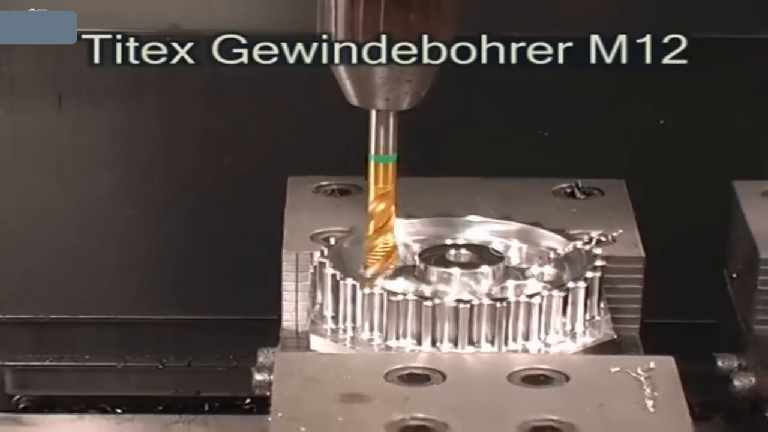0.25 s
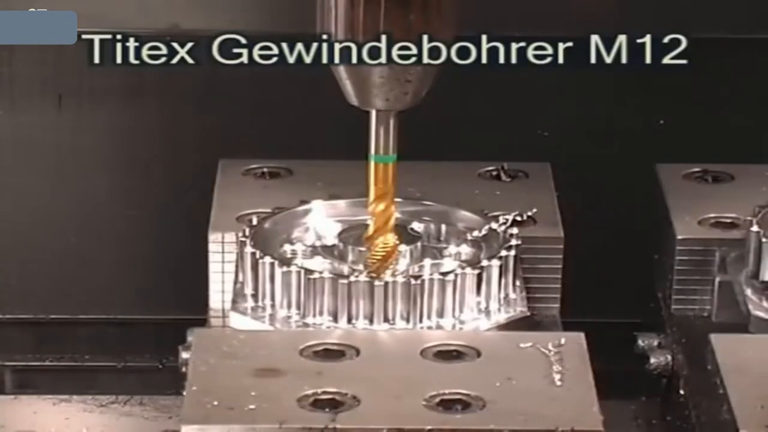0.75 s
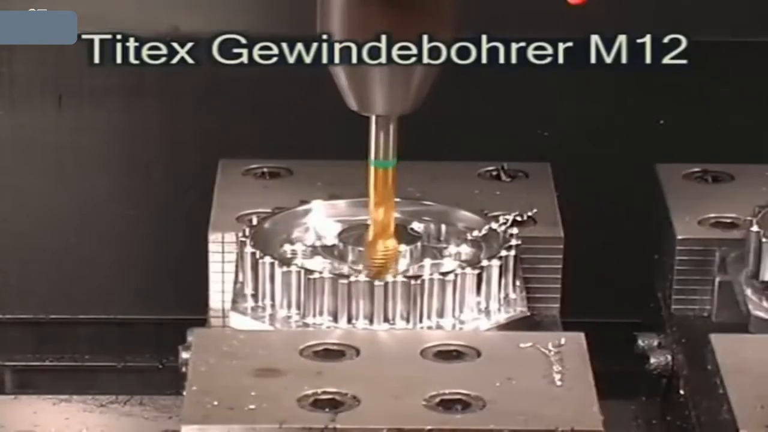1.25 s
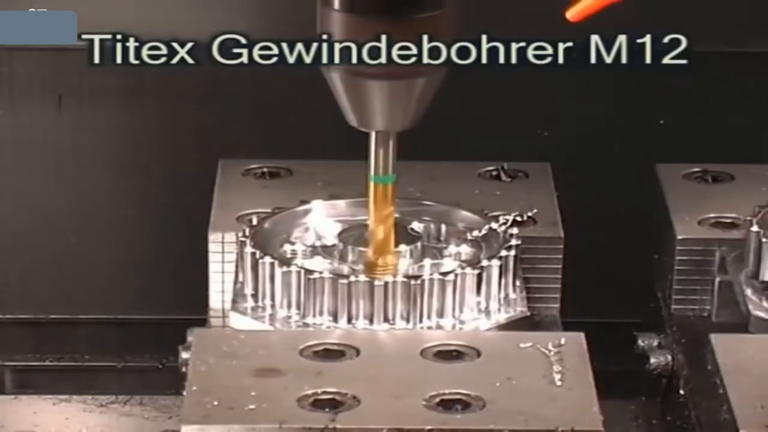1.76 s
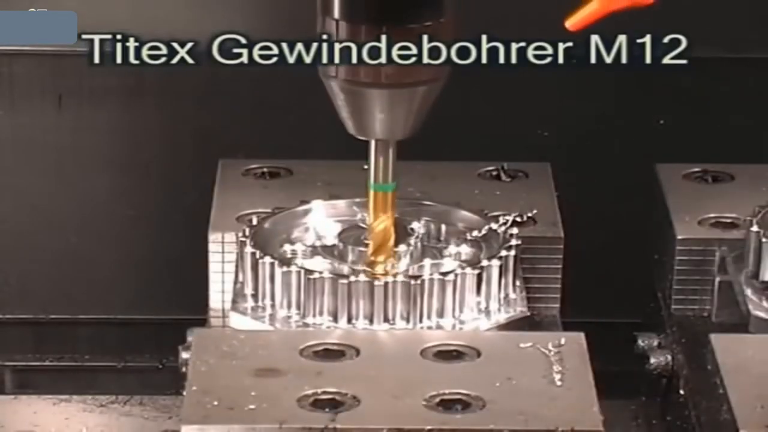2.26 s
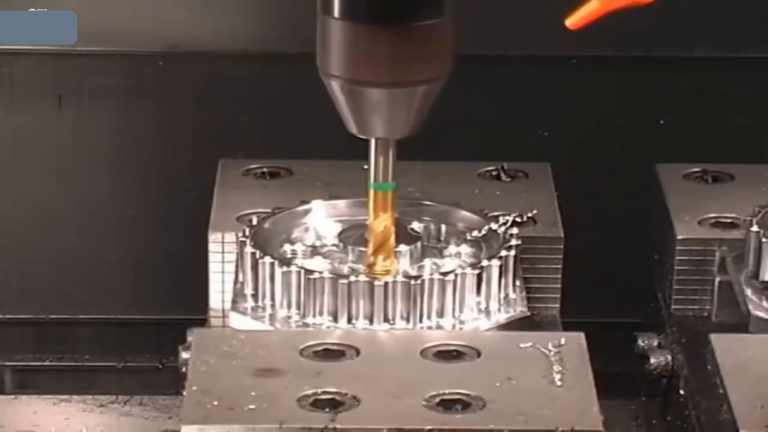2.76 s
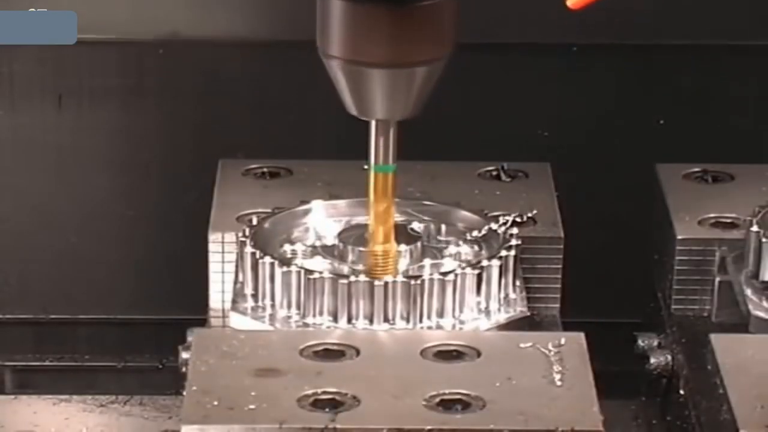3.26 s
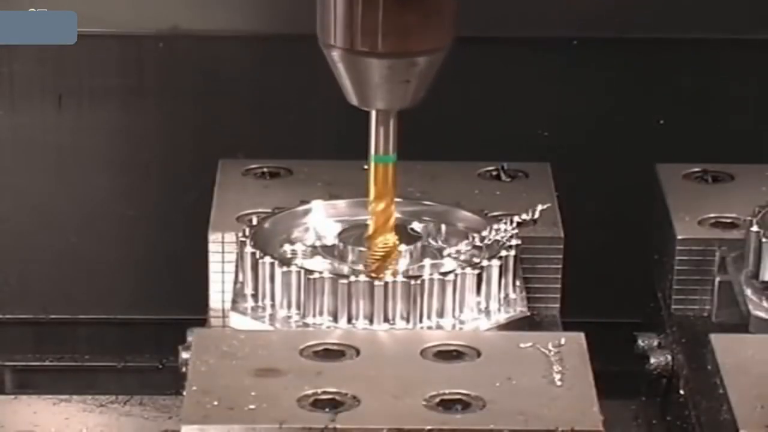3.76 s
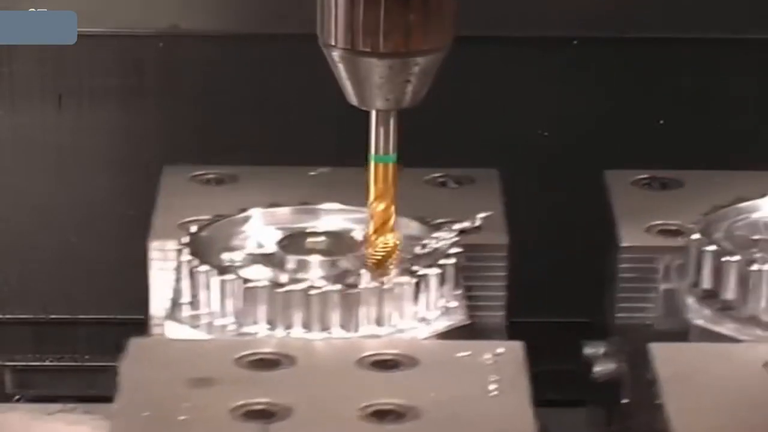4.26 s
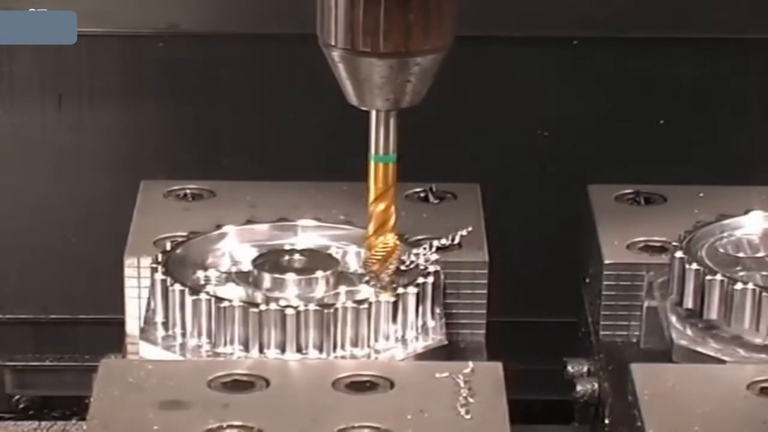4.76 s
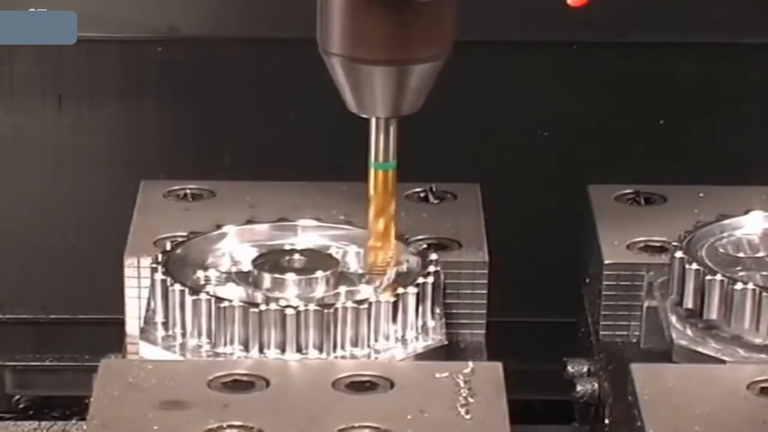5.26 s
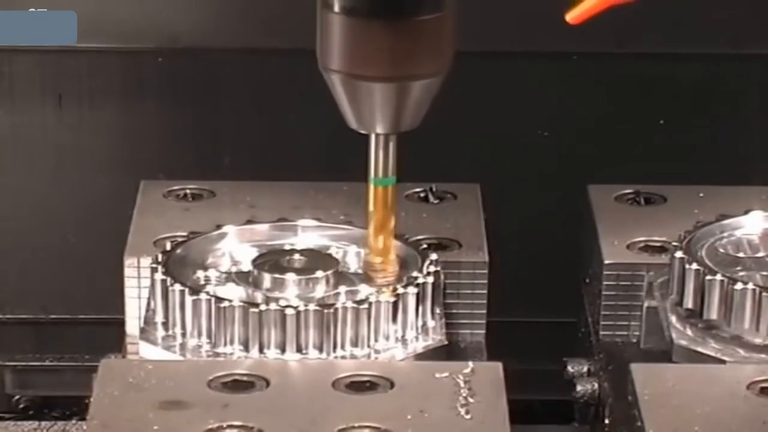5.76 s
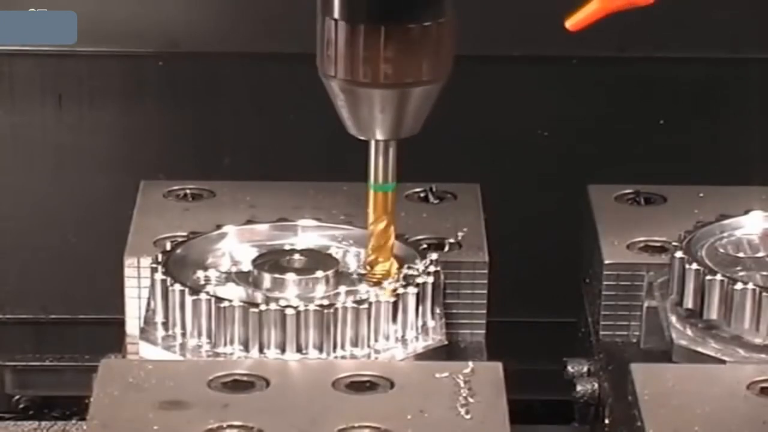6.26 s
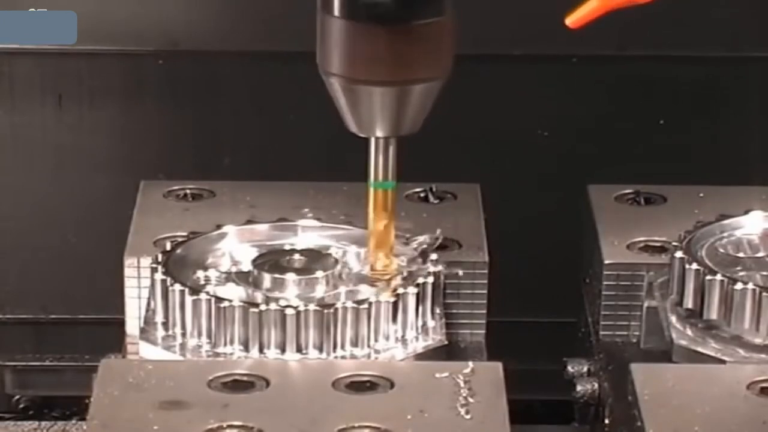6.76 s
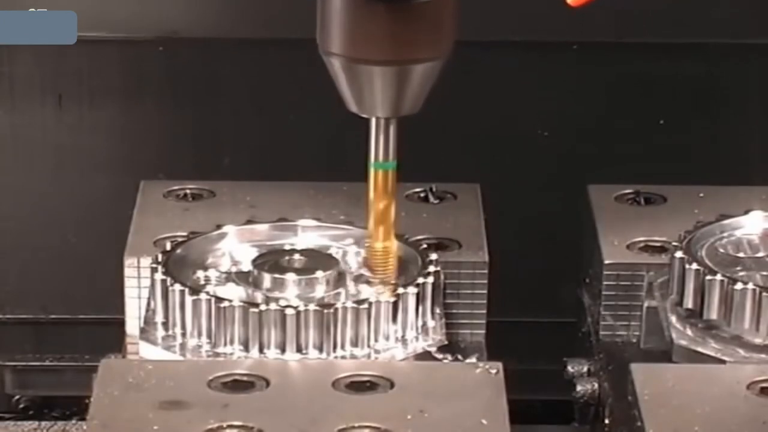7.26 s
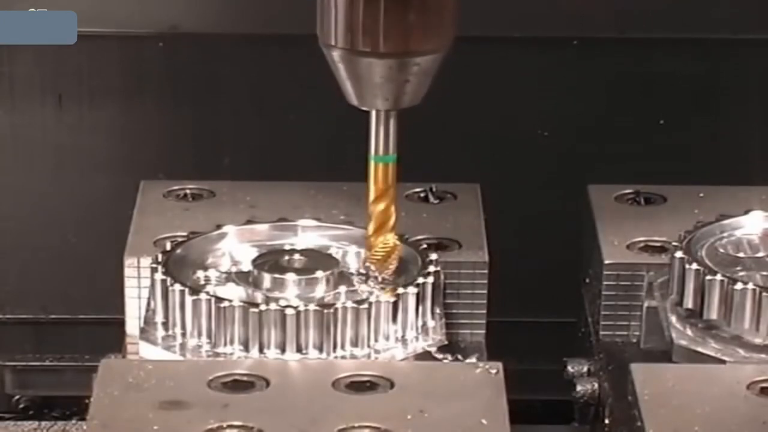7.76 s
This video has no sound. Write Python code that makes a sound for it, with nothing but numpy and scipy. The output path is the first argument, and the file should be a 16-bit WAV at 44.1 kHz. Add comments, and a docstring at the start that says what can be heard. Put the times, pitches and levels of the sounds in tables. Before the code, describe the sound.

Continuous even air hiss from a machining spindle fills a sheet-metal enclosure, its tone shifting subtly, over an almost buried low hum.

```python
"""Air hisses steadily from the spindle of a machining centre tapping two threads in an aluminium part,
with the stereo microphone inside the cabin. The hiss is shaped noise, coloured by the sheet-metal cabin;
the colour shifts as the table changes holes and the tap sinks and backs out. The cut itself is covered.
A motor hums faintly beneath: a steady sine tone, with a narrow noise band as a panel's drone below it."""
import sys
import numpy as np
from scipy import signal
from scipy.fft import rfft
from scipy.io import wavfile
from scipy.ndimage import uniform_filter1d

SR = 44100
rng = np.random.default_rng(int(sys.argv[2]) if len(sys.argv) > 2 else 0)


def dump_mix(stems):
    """Bounce the given channels to the path in sys.argv[1] as a 16-bit WAV at rate SR."""
    frames = np.atleast_2d(stems).T  # one column per channel
    limited = np.clip(frames, -1, 1)  # hard clip at full scale
    pcm = np.round(limited * 32767).astype(np.int16)
    wavfile.write(sys.argv[1], SR, pcm)


N = 352800


def gain_of(db):
    """Decibels to amplitude."""
    return 10 ** (np.asarray(db) / 20)


def evened(x):
    """Scales to an rms of one."""
    return x / np.sqrt(np.mean(x ** 2) + 1e-20)


def read(points, hz):
    """Joins spectrum points by straight lines on a log-frequency axis."""
    f, value = np.transpose(points)
    return np.interp(np.log(hz + 1), np.log(f + 1), value)


def bells(rows, hz):
    """Response in dB of a set of bell-shaped peaks and notches."""
    centre, width, db = np.transpose(rows)
    distance = (hz[:, None] - centre) / width
    return (db * np.exp(-2 * distance ** 2)).sum(1)


def wander(rate, t):
    """Slow random motion of rms one, up to about rate swings a second."""
    speeds = np.fft.rfftfreq(len(t), t[1] - t[0])
    spectrum = rfft(rng.standard_normal(len(t))) * np.exp(-(speeds / rate) ** 2)
    return evened(np.fft.irfft(spectrum, len(t)))


def air_hiss(air_db=-24, flutter_db=0.4, flutter_rate=14, patchy_db=1.28, frame=8192, hop=2048):
    """Smooth turbulent noise through the cabin. In stereo the sound is near mono in the mid-range and wider in
    the bass and treble."""
    # Escaping air over the rumble of the machine. Each row: frequency in Hz, relative level in dB per Hz.
    air_spectrum = [(20, -22.9), (90, -24.0), (150, -17.2), (205, -21.6), (265, -15.6), (350, -17.9),
                    (420, -12.0), (800, -10.1), (980, 0.0), (1500, -2.8), (3500, -2.5), (6000, -0.1),
                    (7500, -2.4), (12600, -2.7), (15500, -7.8)]
    # Stereo width; nearly mono in the mid-range. Each row: frequency in Hz, side minus mid in dB.
    stereo_width = [(60, -5), (150, -10), (230, -9), (350, -11), (440, -16), (720, -16), (950, -44),
                    (3400, -54), (4300, -22), (6000, -21), (8000, -10), (12000, -7.5), (15000, -4)]
    # Stereo balance. Each row: frequency in Hz, left minus right in dB.
    stereo_lean = [(50, -1.4), (250, -.2), (800, 0), (9000, 0), (14000, -1.2)]

    t = np.arange(N // hop + 2) * hop / SR
    hz = np.fft.rfftfreq(frame, 1 / SR)
    shape = (2, len(t), len(hz))
    mid, side = rng.standard_normal(shape) + 1j * rng.standard_normal(shape)
    side = side * gain_of(read(stereo_width, hz))
    lean = gain_of(read(stereo_lean, hz) / 2)  # half the difference to each side

    # eddies: random patches about 3 frames long and 24 frequency bins wide
    eddies = uniform_filter1d(rng.standard_normal(mid.shape), size=3, axis=0)
    eddies = evened(uniform_filter1d(eddies, size=24, axis=1))
    level = gain_of(read(air_spectrum, hz) + cabin_colour(t, hz) + patchy_db * eddies)
    spectra = level * np.array([(mid + side) * lean, (mid - side) / lean])
    _, hiss = signal.istft(spectra, nperseg=frame, noverlap=frame - hop, time_axis=1, freq_axis=2)
    hiss = hiss[:, :N]

    flutter = flutter_db * wander(flutter_rate, np.arange(N) / SR)  # the jet is never quite even
    return gain_of(air_db + flutter) * hiss / hiss.mean(0).std()


def cabin_colour(t, hz, rush_hz=1200, dense_hz=2200, comb_db=1.6):
    """Response in dB of the cabin over time, set by the table's station and the tap's depth."""
    # Fixed peaks and notches of the cabin. Each row: centre in Hz, width in Hz, height in dB.
    cabin_bells = [(428, 38, 2.4), (498, 12, -2.8), (598, 20, -3.8), (807, 114, 1.8), (870, 28, -4.7),
                   (973, 24, 3.7), (1072, 26, 2.8), (1208, 41, 2.6), (1330, 140, -1.7), (1447, 32, 4.8),
                   (1564, 25, -2.0), (1636, 41, 2.7), (1738, 27, 3.2), (1809, 33, -2.5), (2082, 78, 3.9),
                   (2156, 105, -2.8), (2656, 36, 3.2), (3169, 232, 1.3), (3376, 41, -2.5), (3603, 94, 2.0),
                   (3811, 91, -2.4), (5052, 396, -1.5), (6210, 115, 2.8), (6581, 112, -2.3),
                   (8376, 424, 1.1), (9405, 731, -1.3), (10616, 254, 2.2), (11341, 148, -2.2),
                   (12269, 213, 2.4), (14160, 97, 3.1)]
    # Peaks and notches that the vice and part add with the table at each hole.
    # Each row: centre in Hz, width in Hz, height in dB.
    first_hole = [(1304, 31, 2.9), (1895, 90, -1.5), (2059, 92, 1.8), (2298, 38, 2.8), (2529, 28, 2.9),
                  (2655, 40, -3.6), (2860, 62, -2.8), (3302, 108, -1.9), (3683, 111, -1.5), (3950, 47, 2.0),
                  (4783, 42, 2.9), (5095, 39, 2.6), (5227, 137, -1.6), (5446, 86, 2.2), (5627, 34, 2.4),
                  (6012, 46, 3.1), (6459, 37, 2.7), (6760, 42, 2.2), (8137, 79, 2.4), (8467, 76, 2.4),
                  (9388, 59, 3.7), (9972, 387, 0.8), (10050, 44, -3.0), (10668, 83, 2.9),
                  (11858, 306, -2.3), (13425, 48, 2.8), (13565, 119, -2.3), (14555, 521, 1.1)]
    second_hole = [(1289, 73, -2.5), (2035, 129, -2.1), (2691, 264, 1.5), (3118, 34, -2.3), (3300, 72, 2.6),
                   (3673, 98, 1.7), (4636, 43, 1.9), (4776, 34, 2.8), (4888, 78, -2.3), (5120, 42, 2.6),
                   (5424, 56, 2.0), (6014, 41, 2.6), (7420, 41, 3.2), (7706, 64, 2.2), (8032, 250, -1.4),
                   (8471, 59, -2.4), (8829, 76, -3.3), (9029, 157, 1.4), (9194, 73, -2.7), (9336, 52, 2.5),
                   (9632, 80, -2.3), (10355, 145, 1.5), (10614, 159, -2.8), (10955, 74, -2.6),
                   (11763, 272, 1.4), (13573, 68, 3.9), (14502, 33, 3.6), (14766, 147, -2.4)]
    # Peaks and notches of the narrowed gap under the chuck with the tap fully in.
    # Each row: centre in Hz, width in Hz, height in dB.
    first_gap = [(3123, 63, 2.0), (3444, 254, -1.3), (4075, 87, -2.5), (4727, 194, -1.9), (7990, 355, 1.0),
                 (8852, 204, 2.1), (10123, 219, -2.7), (11860, 58, 3.7), (12176, 172, 3.1),
                 (12631, 58, 5.1), (12938, 52, 3.6), (14579, 640, 2.1)]
    second_gap = [(3093, 125, 1.4), (5580, 78, 2.2), (6478, 77, -3.3), (6884, 136, -2.1), (8963, 255, 1.5),
                  (11629, 49, 3.5), (11767, 100, -3.7), (12535, 51, 4.4), (13086, 365, 1.9),
                  (14032, 418, -2.3), (14491, 90, 3.0), (14927, 115, 3.2)]

    station = table_station(t)[:, None]
    depth = tap_depth(t)[:, None]
    # the low rush of the machine grows as the table moves along and as the tap goes in
    rush_db = -2.0 + 1.38 * station + 0.56 * depth
    rush = rush_db / (1 + (hz / rush_hz) ** 4)
    short_waves = hz / np.hypot(hz, dense_hz)  # small faces reflect only short wavelengths
    comb = comb_db * short_waves * reflections(hz, station, depth)

    colour = bells(cabin_bells, hz) + rush + comb
    for stop, hole, gap in [(1, first_hole, first_gap), (2, second_hole, second_gap)]:
        here = np.clip(1 - abs(station - stop), 0, 1)  # one while the tap stands over this hole
        colour = colour + here * (bells(hole, hz) + depth * bells(gap, hz))
    return colour


def reflections(hz, station, depth, delay=.013, table_shift=0.00012, tap_shift=.00005, count=40):
    """Fine comb, rms one, of echoes off bare metal; the paths (scales in s) change as the machine moves."""
    comb = np.zeros((len(depth), len(hz)))
    for length, across, down, phase in rng.standard_normal((count, 4)):
        lag = delay * (.4 + abs(length)) + table_shift * across * station + tap_shift * down * depth
        comb += np.cos((2 * np.pi * (lag * hz + phase)).astype(np.float32))
    return evened(comb)


def stroke(t, start, length):
    """One move of a machine axis from 0 to 1: it speeds up, travels and brakes."""
    travelled = np.clip((t - start) / length, 0, 1)
    return .5 - .5 * np.cos(np.pi * travelled)


def table_station(t):
    """Where the table stands: 0 at the start, 1 at the first hole, 2 at the second."""
    # The table travels on to the next hole. Each row: start in seconds, length in seconds.
    table_moves = [(.25, 0.26), (4.15, .29)]
    return sum(stroke(t, start, length) for start, length in table_moves)


def tap_depth(t, feed_s=1.2, dwell_s=0.66, back_out_s=0.99):
    """How far the tap is in its hole, 0-1: it feeds in, dwells while the spindle reverses, backs out."""
    # The tap feeds into a hole. Each entry: start in seconds.
    tap_starts = [0.94, 4.9]
    depth = 0
    for start in tap_starts:
        depth = depth + stroke(t, start, feed_s)
        depth = depth - stroke(t, start + feed_s + dwell_s, back_out_s)
    return depth


def motor_hum(hum_hz=284.5, hum_db=-57.3, drone_hz=271, drone_width=10, drone_db=-65.5):
    """One steady motor tone, with a panel droning just below it and beating against it."""
    t = np.arange(N) / SR
    level = gain_of(hum_db + .5 * wander(1.4, t))
    tone = level * np.sqrt(2) * np.sin(2 * np.pi * hum_hz * t)
    # a random swing in size and phase spreads the drone into a narrow band
    swing = wander(drone_width, t) + 1j * wander(drone_width, t)
    drone = evened((swing * np.exp(2j * np.pi * drone_hz * t)).real)
    return tone + gain_of(drone_db) * drone


def scene():
    """The hiss with the hum in the middle."""
    return air_hiss() + motor_hum()


def record(dry, edge_hz=15700):
    """A steep band limit: a long linear-phase low-pass takes away the treble above its edge."""
    low_pass = signal.firwin(1023, edge_hz, window=("kaiser", 9), fs=SR)
    return signal.oaconvolve(dry, low_pass[None], "same")


dry = scene()
out = record(dry)
dump_mix(out)
```